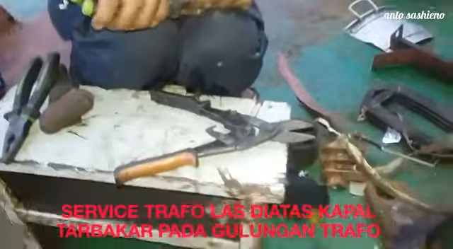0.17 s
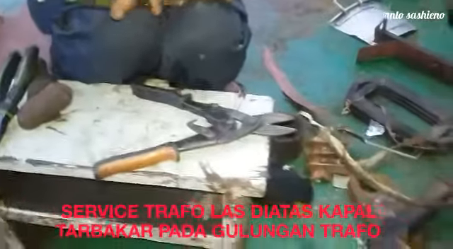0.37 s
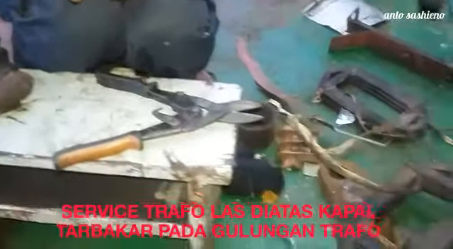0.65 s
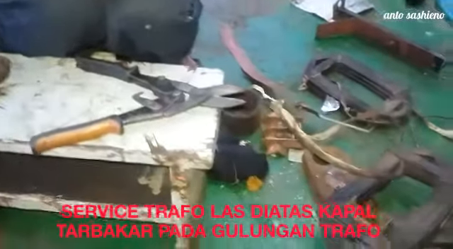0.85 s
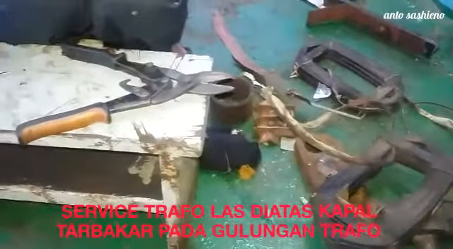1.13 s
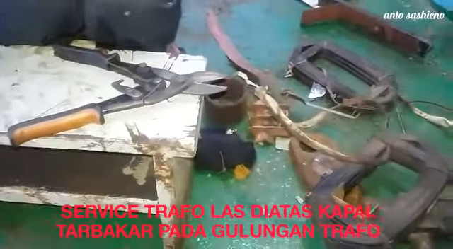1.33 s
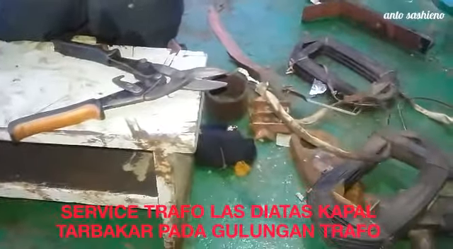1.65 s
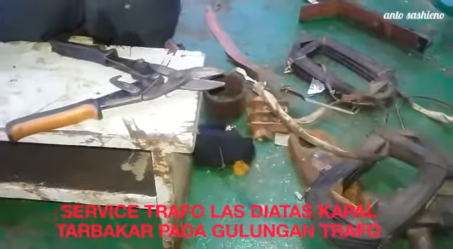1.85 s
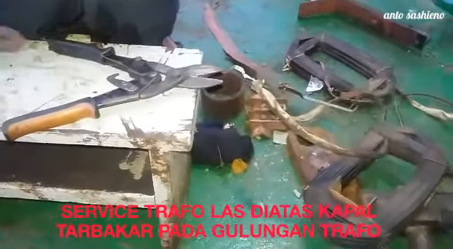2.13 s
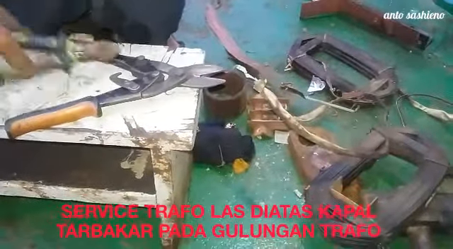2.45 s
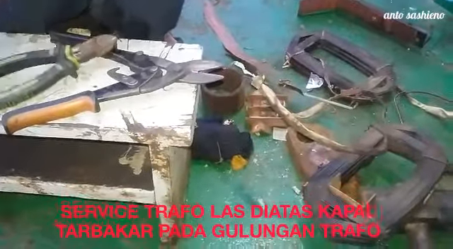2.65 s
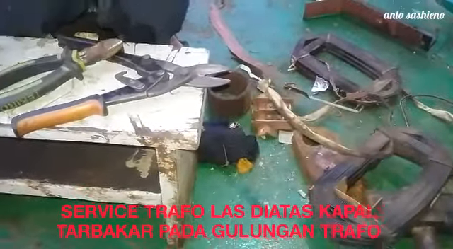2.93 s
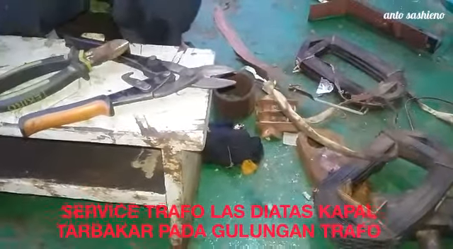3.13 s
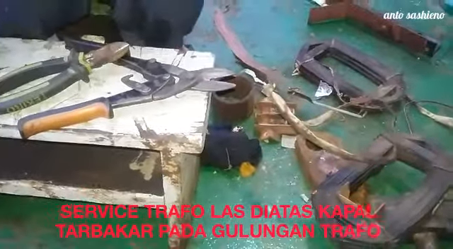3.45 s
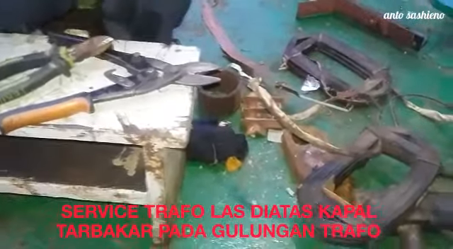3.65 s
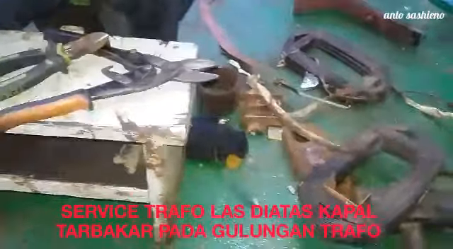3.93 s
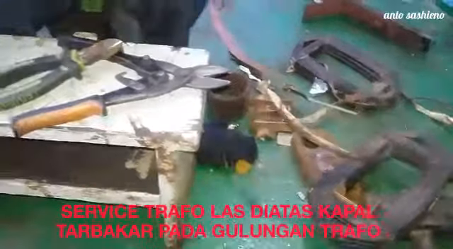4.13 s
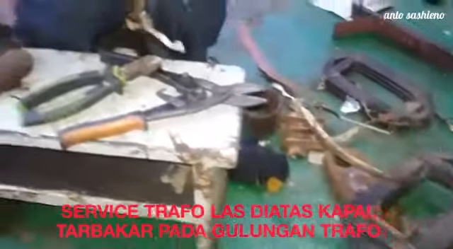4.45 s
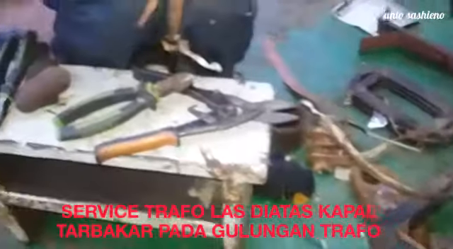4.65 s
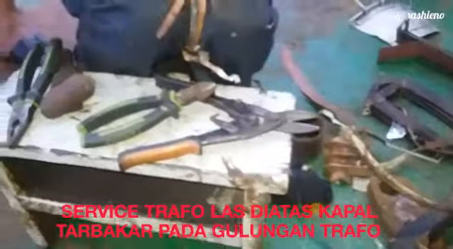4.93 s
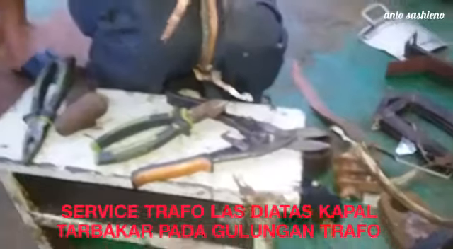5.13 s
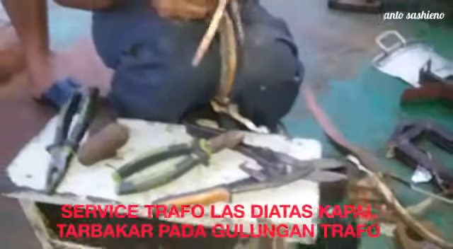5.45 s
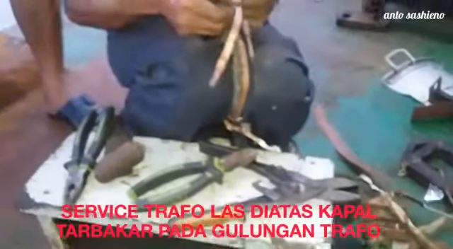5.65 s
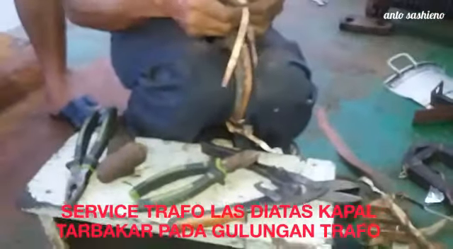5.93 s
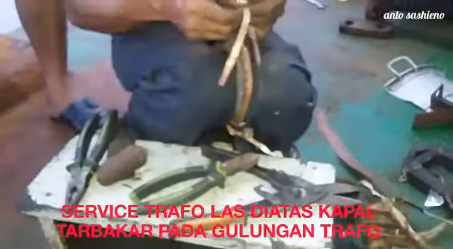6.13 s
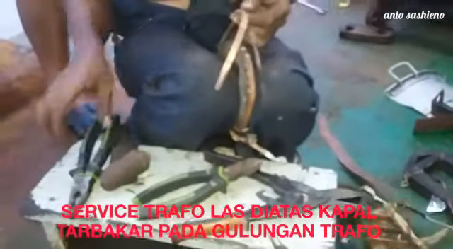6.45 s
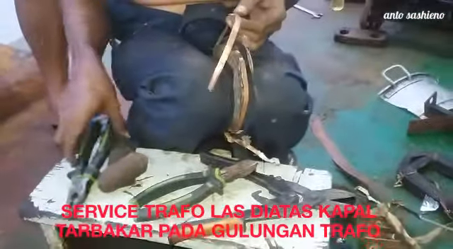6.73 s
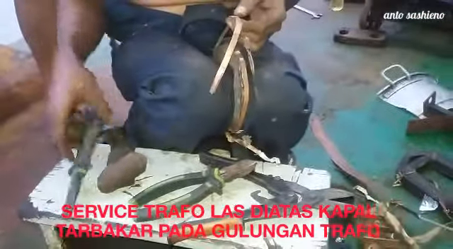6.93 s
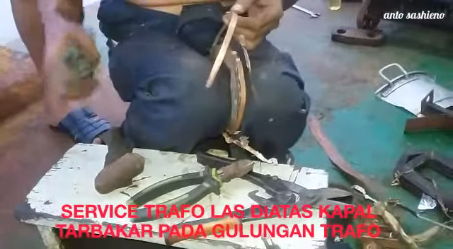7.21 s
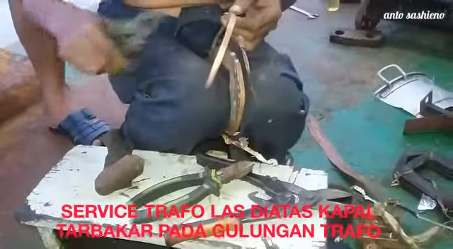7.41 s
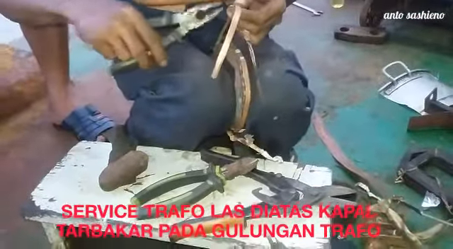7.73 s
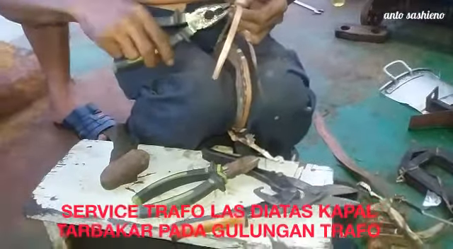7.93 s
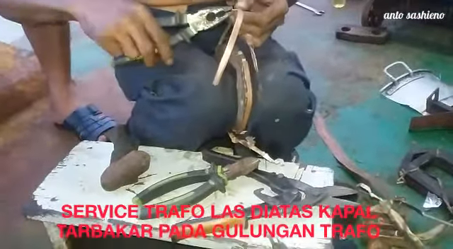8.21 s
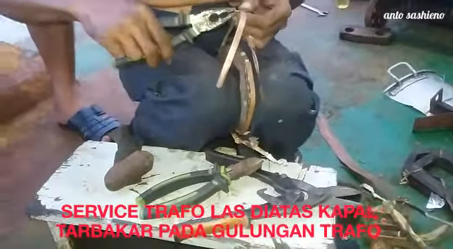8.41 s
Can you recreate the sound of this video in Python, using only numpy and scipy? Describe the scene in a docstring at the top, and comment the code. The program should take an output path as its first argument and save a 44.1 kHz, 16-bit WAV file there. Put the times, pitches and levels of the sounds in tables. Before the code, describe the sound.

Constant droning machinery and rushing air aboard a ship; close by, one sharp tool clatter on a hollow wooden bench, then faint bumps and scuffs.

```python
"""Ventilation roars and drones on a ship's steel deck, over the hum of a slow engine and a second machine
beating against it; close by, pliers click, drop on a wooden bench and bounce, among soft knocks and scuffs.
Air is shaped noise, the duct fuzzy resonant tones, the machines sums of sines. Pliers and bench are struck
decaying modes, with cracks of noise where surfaces meet; the bulkheads answer the tools. The listener turns
towards the work partway through, and the air and duct tones change level."""
import sys
import numpy as np
from scipy import signal
from scipy.fft import rfft, irfft, next_fast_len
from scipy.io import wavfile
from scipy.ndimage import uniform_filter1d, map_coordinates

SR = 44100
rng = np.random.default_rng(int(sys.argv[2]) if len(sys.argv) > 2 else 0)


def digitize_waveform(pressure):
    """Quantize a signal to 16-bit integers and store it at the path in sys.argv[1].

    Rows of a 2-D input are taken as channels; values are limited to [-1, 1].
    """
    field = np.atleast_2d(pressure).T
    bounded = np.clip(field, -1, 1)
    quanta = np.round(bounded * 32767).astype(np.int16)
    wavfile.write(sys.argv[1], SR, quanta)


N = 377918


def amp(db):
    """Gain of a level in dB."""
    return 10 ** (np.asarray(db) / 20)


def unit(x):
    """Scaled to rms 1."""
    return x / np.sqrt(np.mean(x ** 2) + 1e-20)


def along(points, hz):
    """(Hz, value) points interpolated on a log frequency axis."""
    point_hz, value = np.transpose(points)
    return np.interp(np.log(hz + 1), np.log(point_hz + 1), value)


def curves(rows):
    """One value per sample for each column after the time."""
    s, *columns = np.transpose(rows)
    return [np.interp(np.arange(N) / SR, s, column) for column in columns]


def wobble(rate):
    """A smooth random curve through rate knots a second, at most 20."""
    knots = rng.standard_normal(int(N * 20 / SR) + 4)
    return map_coordinates(knots, [np.arange(N) * min(rate, 20) / SR])


def filtered(x, response):
    """x times a response of frequency, padded so that its end does not wrap onto its start."""
    m = next_fast_len(N + SR // 2)
    return irfft(rfft(x, m) * response(np.fft.rfftfreq(m, 1 / SR)), m)[:N]


def bump(hz, centre_hz, width_hz):
    """A resonance peak of height 1."""
    return 1 / (1 + (2 * (hz - centre_hz) / width_hz) ** 2)


def rush(response, patchy_db):
    """Coloured noise of rms 1 with patches of random gain in time and frequency."""
    z = signal.stft(rng.standard_normal(N), nperseg=512)[2]
    field = uniform_filter1d(rng.standard_normal(z.shape), 6, 0)
    field = uniform_filter1d(field, 10, 1)
    patchy = signal.istft(z * amp(patchy_db * unit(field)), nperseg=512)[1][:N]
    return unit(filtered(patchy, response))


def sine(phase, level_db):
    """A sine at an rms level, starting at a random phase."""
    return np.sqrt(2) * amp(level_db) * np.sin(phase + rng.uniform(0, 2 * np.pi))


TURN_S, TURN_LASTS_S = 5.75, 0.8  # middle and length of the turn


def turn(before, after):
    """A level that glides from one value to another while the listener turns towards the work."""
    share = np.clip((np.arange(N) / SR - TURN_S) / TURN_LASTS_S + .5, 0, 1)
    return before + (after - before) * share


# Rumble, roar and hiss of the air, one row each: before_turn_db, after_turn_db
AIR_LEVELS = [(-35.5, -35.5), (-34, -33.5), (-48, -47.5)]
# Spectra of the three, later scaled to their levels: freq_hz, relative_db
RUMBLE_SPECTRUM = [(18, -35), (30, -22), (64, -5), (86, 1), (109, -6), (140, -7.5), (230, -8), (289, -29),
                   (329, -18.5), (400, -14), (520, -48), (880, -120)]
ROAR_SPECTRUM = [(150, -33.5), (250, -13), (269, -13), (287, -15.5), (320, -3.5), (422, -10.5), (474, -2.5),
                 (600, -5.5), (826, -6.5), (959, -9.5), (1150, -11.5), (2270, -14.5), (3200, -29),
                 (4160, -46), (7040, -120)]
HISS_SPECTRUM = [(1290, -30), (2200, -1.5), (2500, -13), (2900, -10.5), (3500, -9.5), (4500, -14),
                 (5300, -19.5), (6600, -19), (7200, -24), (7700, -31), (8500, -39), (9500, -45.5),
                 (10200, -64), (13000, -50), (22000, -120)]
# Deck plates and casings that the roar excites: centre_hz, width_hz, boost_db
PLATE_RESONANCES = [(351, 22, -6), (475, 12, 3.5), (557, 44, 2.5), (666, 30, 2.5), (1144.5, 29, 8),
                    (1309, 110, 5.5), (885, 30, 3), (1580, 83, 5.5), (1697, 49, 5.5), (1827, 53, 4),
                    (2280, 67, 3.5), (2460, 60, 3), (2634, 30, 8), (2690, 40, 4), (2830, 75, 8),
                    (3010, 50, 4.5)]


def ventilation():
    """Rumble through the hull, roar ringing the plates, and hiss of air: three bands of shaped noise."""
    rumble_db, roar_db, hiss_db = (turn(*levels) for levels in AIR_LEVELS)

    def roar_on_plates(hz):
        """Roar spectrum raised where the plates resonate."""
        boost_db = sum(db * bump(hz, centre, width) for centre, width, db in PLATE_RESONANCES)
        return amp(along(ROAR_SPECTRUM, hz) + boost_db)

    rumble = rush(lambda hz: amp(along(RUMBLE_SPECTRUM, hz)), patchy_db=2.0)
    roar = rush(roar_on_plates, patchy_db=0.56)
    hiss = rush(lambda hz: amp(along(HISS_SPECTRUM, hz)), patchy_db=0.85)
    flutter = wobble(9.1)  # shared by roar and hiss
    rumble *= amp(rumble_db + 0.31 * wobble(1.5))
    roar *= amp(roar_db + 0.3 * flutter)
    hiss *= amp(hiss_db + 0.17 * flutter)
    return rumble + roar + hiss


# Duct resonances: centre_hz, width_hz, before_turn_db, after_turn_db
DUCT_TONES = [(763.5, 56, -42, -40.5), (814.7, 23, -42.5, -48.5), (840, 30, -46.5, -41.5)]
DUCT_SWAY_DB = 2.2  # scale of each tone's own random swell and fade


def drone():
    """Turbulence holds the duct's resonances as fuzzy tones: noise through narrow peaks."""
    out = np.zeros(N)
    for centre_hz, width_hz, before_db, after_db in DUCT_TONES:
        level_db = turn(before_db, after_db) + DUCT_SWAY_DB * wobble(2.94)
        out += amp(level_db) * rush(lambda hz: bump(hz, centre_hz, width_hz), patchy_db=0.5)
    return out


# Engine orders: cycle_multiple, rms_db around which each sways
ENGINE_ORDERS = [(5, -58), (6, -48), (9, -51), (10, -48), (11, -44), (15, -47), (18, -57), (19, -54),
                 (20, -54), (23, -54), (24, -53), (26, -55), (27, -56), (30, -55), (32, -59)]
# Swelling and sinking of the strongest order, the twelfth: time_s, rms_db around which it sways
TWELFTH_ORDER_LEVEL = [(0, -32.5), (.5, -26.5), (1.0, -30.5), (1.6, -32.5), (2.1, -29), (3.3, -31),
                       (4.5, -29), (5.1, -28.5), (5.68, -36.5), (5.95, -28.5), (7.1, -29), (7.85, -34),
                       (8.4, -29)]
CYCLE_HZ = 7.3515
EIGHTH_DB = -34  # second strongest order, rms
WAVER_DB = 0.3  # scale of the random sway of every machine line


def engine():
    """All orders are multiples of one crank angle, which drifts a little."""
    crank = 2 * np.pi * CYCLE_HZ * np.arange(N) / SR + 0.029 * wobble(1.142)
    twelfth_db, = curves(TWELFTH_ORDER_LEVEL)
    orders = [*ENGINE_ORDERS, (8, EIGHTH_DB), (12, twelfth_db)]
    return sum(sine(round(order) * crank, db + WAVER_DB * wobble(2.0)) for order, db in orders)


# A second machine, slightly off speed: pitch_hz, rms_db around which it sways, unsteadiness_rad
SECOND_LINES = [(52.13, -55, .2), (61.96, -49, .2), (76.67, -43, .2), (153.3, -54, .4), (258.3, -48, 1.5)]


def second_machine():
    """Nearly steady lines that beat with the engine orders."""
    t = np.arange(N) / SR
    out = np.zeros(N)
    for hz, db, drift_rad in SECOND_LINES:
        phase = 2 * np.pi * hz * t + drift_rad * wobble(2.1)
        out += sine(phase, db + WAVER_DB * wobble(2.0))
    return out


# Decay between the bulkheads: freq_hz, t60_s
BULKHEAD_DECAY = [(200, 1), (1500, 0.2), (7000, 0.16), (10000, 0.074)]


def bulkheads(x):
    """The nearby walls answer 200 samples late with noise, each frequency dying at its own speed."""
    hz, t, z = signal.stft(rng.standard_normal(SR // 2), SR, nperseg=256)
    decay = amp(-60 * t / along(BULKHEAD_DECAY, hz)[:, None])
    tail = signal.istft(z * decay, SR, nperseg=256)[1]
    return signal.fftconvolve(np.pad(x, (200, 0)), tail / np.linalg.norm(tail))[:N]


def rattle(t, depth, size):
    """Random gain around 1, smoothed over size samples: loose parts break up a ring."""
    jolts = rng.standard_normal(len(t))
    return 1 + depth * unit(signal.fftconvolve(jolts, np.hanning(size), "same"))


# Cloth and cable brushing by, shaped by noise and rattle: centre_s, level_db, length_s
SCUFF_STROKES = [(3.203, -52, 0.017), (3.467, -43, 0.045), (3.89, -55, 0.033), (3.987, -39.5, 0.051),
                 (4.754, -41, 0.031), (6.15, -41.5, 0.039), (6.3, -50, 0.024), (6.69, -41, 0.039)]
# Colour of the brushing: freq_hz, relative_db
BRUSH_SPECTRUM = [(400, -8.5), (1500, 5.5), (3000, -4.5), (5000, -14), (7000, -18), (8000, -30),
                  (9500, -62)]


def scuffs():
    """Short soft swishes without a ring: noise under smooth bell-shaped strokes."""
    t = np.arange(N) / SR
    stroke = sum(amp(db) * np.exp(-((t - s) / length) ** 2) for s, db, length in SCUFF_STROKES)
    brush = rush(lambda hz: amp(along(BRUSH_SPECTRUM, hz)), patchy_db=1)
    return stroke * rattle(t, depth=0.49, size=150) * brush


def near(spot_hz, sharp):
    """How well a blow at one spot reaches each mode; a higher sharp picks fewer."""
    return lambda hz: 1 / (1 + (sharp * np.log2(hz / spot_hz)) ** 2)


def ring(modes, t, attack, favour):
    """One blow: every mode decays from a new random strength and sign, after a rise of attack seconds."""
    out = np.zeros(len(t))
    for hz, db, t60 in modes:
        strength = rng.choice([-1, 1]) * favour(hz)
        decay = amp(db + rng.normal(0, 1.5) - 60 * t / t60)
        out += strength * decay * np.sin(2 * np.pi * hz * t)
    return out * (1 - np.exp(-t / attack))


def damped(modes, damping):
    """The same modes with every ring shortened."""
    return [(hz, db, t60 / damping) for hz, db, t60 in modes]


# Soft knocks through the bench's hollow box: start_s, level_db, spot_hz near which it rings best
KNOCK_BLOWS = [(.80, -30, 358), (2.428, -31, 298), (2.666, -28.5, 258), (2.697, -18, 112),
               (2.721, -18.5, 180), (2.78, -20, 297), (2.809, -26.5, 350), (2.84, -29, 193),
               (2.899, -21, 230), (3.96, -24.5, 393), (4.03, -24, 393), (4.13, -30.5, 238),
               (4.737, -21.5, 380), (4.739, -27, 200), (4.771, -18, 240), (4.777, -23.5, 344),
               (4.775, -22, 475), (4.809, -29, 475), (4.789, -22, 128), (4.871, -22, 190),
               (4.919, -26, 340), (6.173, -29, 361), (6.68, -20.5, 121), (8.071, -25, 385),
               (8.231, -25, 450)]
# Modes of the hollow box: pitch_hz, relative_db, t60_s before damping
BOX_MODES = [(103, 0, .35), (122, 0, .3), (180, -4, .25), (228, -3, .25), (258, 0, .3), (300, -5, .2),
             (348, 0, .25), (395, -3, .25), (478, -2, .3)]
BOX_DAMPING = 1.4  # tools lying on the bench divide the box's t60 by this


def knocks():
    """Padded blows swell gradually and ring the box's low modes."""
    out, t = np.zeros(N + SR), np.arange(SR // 2) / SR
    modes = damped(BOX_MODES, BOX_DAMPING)
    for s, db, spot_hz in KNOCK_BLOWS:
        blow = ring(modes, t, 0.0053, near(spot_hz, 6.1))
        blow *= rattle(t, depth=0.24, size=1000)
        out[round(s * SR):][:len(t)] += amp(db) * blow
    return out[:N]


SOFT_HZ = 3720  # a gentle contact loses the treble above this


def soften(hz):
    """Treble lost in a gentle contact."""
    return 1 / (1 + (hz / SOFT_HZ) ** 6)


# The pliers' steel clicks: start_s, level_db, spot_hz near which the struck part rings best
PLIER_CLICKS = [(2.612, -10.5, 4800), (2.6124, -13, 7100), (2.62, -24, 5000), (2.624, -28, 6400),
                (2.653, -22.5, 4150), (2.661, -21.5, 4150), (2.663, -23.5, 5000), (2.6735, -19, 3400),
                (2.6727, -18.5, 5200), (2.6772, -25, 6500), (2.708, -34, 4300), (2.754, -32, 4100),
                (2.8875, -36, 4480), (4.751, -41, 3600)]
# Modes of the pliers: pitch_hz, relative_db, t60_s before damping
STEEL_MODES = [(2310, -16, .04), (3380, -5, .03), (4150, -4, .035), (4560, -5, .03), (4900, -5, .025),
               (5180, -1, .03), (5450, -6, .025), (6000, -10, .03), (6400, -7, .03), (6770, -1, .03),
               (7100, -8, .03), (7900, -13, .03), (9330, -7, .03), (10200, -3, .03), (11700, -2, .015)]
# Pliers meeting the bench: start_s, level_db, spot_hz near which the struck spot rings best
BENCH_CONTACTS = [(2.612, -19.5, 970), (2.614, -24, 2000), (2.626, -19, 900), (2.6621, -12.5, 2000),
                  (2.6622, -1.5, 560), (2.6635, -14, 1110), (2.668, -14.5, 2800), (2.673, -13, 1570),
                  (2.6775, -13, 1490), (2.683, -17, 1290), (2.669, -14.5, 590), (2.685, -18.5, 620),
                  (2.6925, -19, 460), (2.701, -29, 800), (2.708, -19, 410), (2.733, -29, 600),
                  (2.753, -23, 1430), (2.753, -14.5, 613), (2.766, -30, 1550), (2.778, -16, 634),
                  (2.80, -24, 620), (2.818, -36, 1310), (2.84, -24, 805), (2.888, -24.5, 1590),
                  (2.89, -24.5, 640), (2.898, -29, 1150), (2.929, -29, 640), (4.738, -25, 2190),
                  (4.88, -28, 2750), (4.891, -34, 2100)]
# Modes of the bench top: pitch_hz, relative_db, t60_s
BENCH_MODES = [(404, -4, .1), (487, -3, .06), (570, -1, .035), (621, -4.5, .13), (700, -12, .04),
               (800, -6, .08), (960, -8, .06), (1100, -5, .07), (1265, -6, .08), (1335, -2, .07),
               (1430, -4, .06), (1590, -3, .05), (1640, -6, .06), (1782, -7, .05), (1990, -6, .04),
               (2137, -7, .04), (2700, -6, .04), (2900, -8, .04)]
# Colour of the crack where surfaces meet: freq_hz, relative_db
CRACK_SPECTRUM = [(300, -7), (900, 8.5), (2500, -0.5), (5000, -1.5), (7000, -22), (9000, -26), (13000, -43)]
STEEL_DAMPING = 1.4  # the hand and the bench divide the steel's t60 by this
SPOT_SHARPNESS = 4.5  # how narrowly a blow picks the modes near its spot
CRACK_OVER_STEEL_DB, CRACK_OVER_BENCH_DB = -9, -10  # crack against the ring; bench value at a 1000 Hz spot
CRACK_DB_PER_OCTAVE = 5  # bench spots that ring higher are harder and crack louder
TICK_DB, TICK_S, CRACK_S = -5, 0.0021, 0.023  # brief tick against the crack, and the t60 of both


def contacts():
    """Clicks ring the pliers, blows ring the bench, and both crack where the surfaces meet."""
    out, t = np.zeros(N + SR), np.arange(SR // 2) / SR
    grit = rush(lambda hz: amp(along(CRACK_SPECTRUM, hz)), patchy_db=3)
    dull_grit = filtered(grit, soften)
    onset = 1 - np.exp(-(t / 0.0016) ** 2)
    crack_shape = (amp(-60 * t / CRACK_S) + amp(TICK_DB - 60 * t / TICK_S)) * onset
    steel = damped(STEEL_MODES, STEEL_DAMPING)
    for s, db, spot_hz in PLIER_CLICKS:
        start = round(s * SR)
        blow = ring(steel, t, 0.0006, near(spot_hz, SPOT_SHARPNESS))
        blow *= rattle(t, depth=0.53, size=40)  # loose jaws rattle
        crack = crack_shape * np.roll(grit, -start)[:len(t)]
        blow += amp(CRACK_OVER_STEEL_DB) * crack
        out[start:][:len(t)] += amp(db) * blow
    for s, db, spot_hz in BENCH_CONTACTS:
        start = round(s * SR)
        attack = 0.26 / spot_hz  # low spots are met softly
        blow = ring(BENCH_MODES, t, attack, near(spot_hz, SPOT_SHARPNESS))
        blow *= rattle(t, depth=0.37, size=300)
        crack_db = CRACK_OVER_BENCH_DB + CRACK_DB_PER_OCTAVE * np.log2(spot_hz / 1000)
        crack = crack_shape * np.roll(dull_grit, -start)[:len(t)]
        blow += amp(crack_db) * crack
        out[start:][:len(t)] += amp(db) * blow
    return out[:N]


def scene():
    """Machinery all around, tools close by with the bulkheads' answer."""
    machinery = ventilation() + drone() + engine() + second_machine()
    tools = scuffs() + knocks() + contacts()
    return (machinery + tools + amp(-13.0) * bulkheads(tools))[None]


TOP_HZ, BASS_HZ = 13044, 38  # the sound holds nothing above the first; bass falls away below the second


def record(dry):
    """The loudest blow saturates softly; the microphone loses deep bass; the sound holds nothing above TOP_HZ."""
    held = dry[0] / (1 + np.abs(dry[0] / .95) ** 6) ** (1 / 6)
    return filtered(held, lambda hz: (hz < TOP_HZ) * hz ** 4 / (hz ** 4 + BASS_HZ ** 4))[None]


dry = scene()
out = record(dry)
digitize_waveform(out)
```